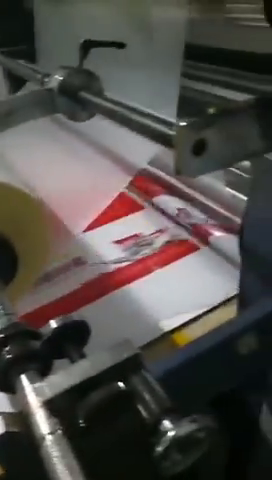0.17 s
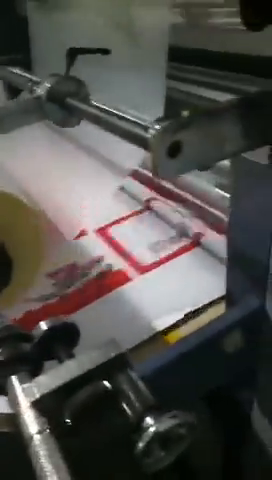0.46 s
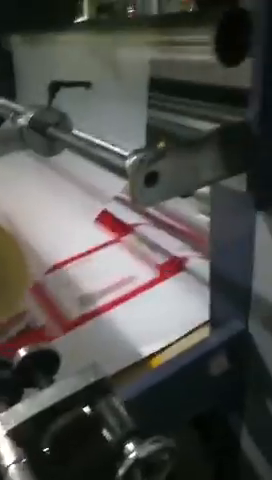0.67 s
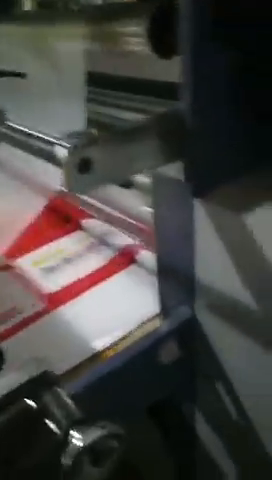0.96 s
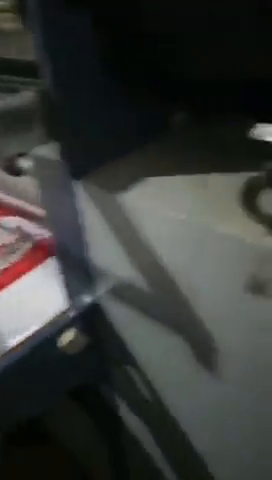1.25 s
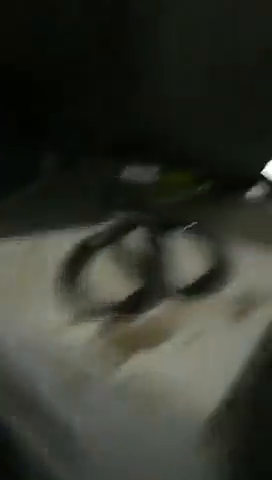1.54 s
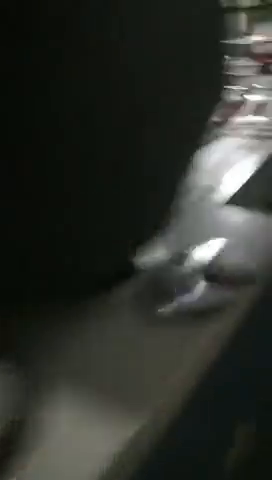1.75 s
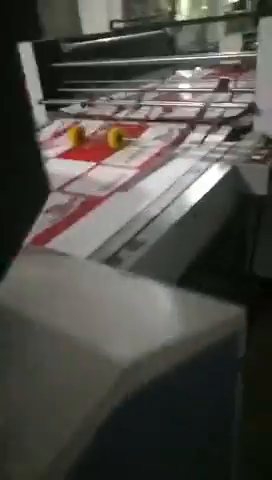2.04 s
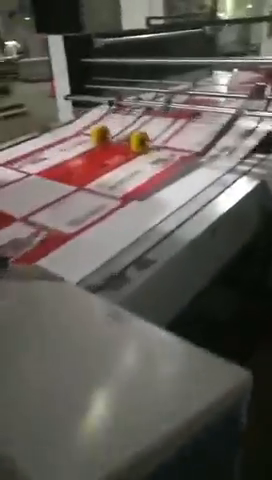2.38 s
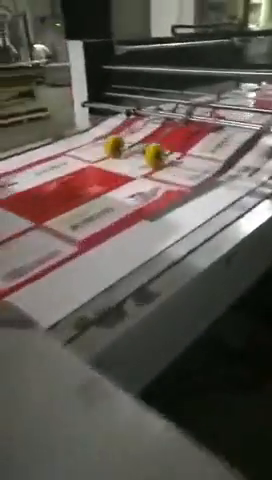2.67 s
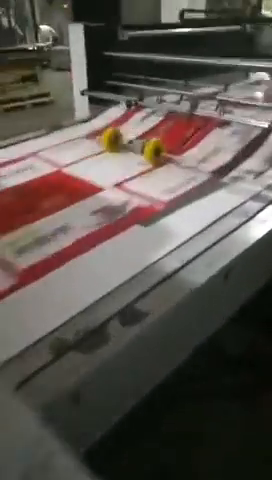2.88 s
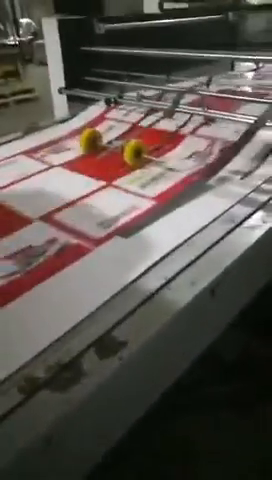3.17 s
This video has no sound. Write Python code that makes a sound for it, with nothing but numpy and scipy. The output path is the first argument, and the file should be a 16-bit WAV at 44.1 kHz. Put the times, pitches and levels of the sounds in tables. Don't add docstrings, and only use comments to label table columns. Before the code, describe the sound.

A sheet-feeding machine roars throughout, about 3.3 seconds: dense roller noise, low frame rumble, a hollow table boom and a motor hum that surges unevenly. Suction air hisses in puffs from 0.6 to 1.2, around 1.6-2.2, and near 2.8-3.3, with a faint whistle near 3.0. Metal grippers clack at 1.3 and clatter hardest at 2.25-2.4, with short hall echo. The roar eases slightly late; close phone stereo.

```python
import sys
import numpy as np
from scipy import signal
from scipy.fft import rfft, irfft, next_fast_len
from scipy.io import wavfile

SR = 44100
rng = np.random.default_rng(int(sys.argv[2]) if len(sys.argv) > 2 else 0)


def transcribe(signal):
    frames = np.atleast_2d(signal).T
    limited = np.clip(frames, -1, 1)
    pcm = np.round(limited * 32767).astype(np.int16)
    wavfile.write(sys.argv[1], SR, pcm)


def nominal_scale(level):
    x = np.asarray(level, float) / 20
    return 10 ** x


N = 145971
T = np.arange(N) / SR


def in_time(rows):
    return np.interp(T, *np.transpose(rows))


def at_hz(points, hz):
    log_hz = np.log(np.array(points)[:, 0])
    return np.interp(np.log(hz), log_hz, np.array(points)[:, 1])


def rms_one(x):
    return x / np.sqrt(np.mean(x ** 2) + 1e-20)


def drift(rate_hz):
    r = np.exp(-80 * np.pi * rate_hz / SR)
    slow = signal.lfilter([1], [1, -2 * r, r * r], rng.standard_normal(N // 40 + 2002))[2000:]
    return np.interp(np.arange(N) / 40, np.arange(len(slow)), rms_one(slow - slow.mean()))


def bandpass(x, low_hz, high_hz):
    return signal.sosfilt(signal.butter(2, [low_hz, high_hz], "band", fs=SR, output="sos"), x)


def resonance(x, hz, width_hz):
    r = np.exp(-np.pi * width_hz / SR)
    poles = [1, -2 * r * np.cos(2 * np.pi * hz / SR), r * r]
    return signal.lfilter([(1 - r * r) / 2, 0, (r * r - 1) / 2], poles, x + 1e-18)


def narrow(hz, width_hz):
    noise = rng.standard_normal((2, N + SR))
    tone = resonance(resonance(noise, hz, width_hz), hz, width_hz)
    return rms_one(tone[:, SR:])


def banded(white, spectrum, low_hz, high_hz, count, shared_db, own_db, rate):
    out = 0
    together = drift(rate / 2)
    edges = np.geomspace(low_hz, high_hz, count + 1)
    for k, (low, high) in enumerate(zip(edges, edges[1:])):
        band = bandpass(white[k % 2], low, high)
        flicker_db = shared_db * together + own_db * drift(rate)
        out = out + band * nominal_scale(at_hz(spectrum, np.sqrt(low * high)) + flicker_db)
    return rms_one(out)


# (time [s], level [dB])
NEARNESS = [(0.0, -26), (0.36, -27.5), (0.56, -27), (0.72, -26), (1.2, -26.5), (1.55, -26.5), (1.9, -27),
            (2.18, -28), (2.42, -27), (2.55, -29), (2.72, -29.5), (3.0, -29.5), (3.31, -29)]


def nearness():
    return in_time(NEARNESS)


# (time [s], hum level [dB], octave level [dB])
MOTOR_LOAD = [(0.0, -33, -47), (0.05, -34, -43), (0.31, -23.5, -34), (0.45, -35, -25), (0.57, -15.5, -30),
              (0.8, -30, -39), (1.23, -40.5, -27.5), (1.29, -32, -55), (1.35, -18.5, -34),
              (1.58, -26.5, -39), (1.66, -26.5, -18.5), (1.82, -34, -34), (1.95, -15.5, -27.5),
              (2.21, -50, -29.5), (2.29, -29, -39), (3.18, -30, -36), (3.235, -41, -20), (3.31, -20, -33)]
# (frequency [Hz], width [Hz], level re load [dB])
MOTOR_HUM = [
    (113.85, 8, -6.5),
    (228, 11, -4.5),
]
# (multiple of the mesh frequency [1], level [dB])
GEAR_MESH = [(2, -44.5), (3, -47.5), (5, -48)]
MESH_HZ, MESH_WIDTH_HZ = 316.3, 8


def motor(near_db):
    times, *loads = np.transpose(MOTOR_LOAD)
    hum = 0
    for (hz, width_hz, db), load_db in zip(MOTOR_HUM, loads):
        level_db = db + np.interp(T, times, load_db) + 2.3 * drift(14.0)
        phase = 2 * np.pi * np.cumsum(hz + width_hz * 0.5 * drift(8.05)) / SR
        hum = hum + nominal_scale(level_db) * np.sqrt(2) * np.sin(phase)
    mesh = sum(nominal_scale(db) * narrow(k * MESH_HZ, MESH_WIDTH_HZ) for k, db in GEAR_MESH)
    return hum + mesh * nominal_scale(near_db - near_db.mean())


# (time [s], level [dB])
BOARD_DRUMMING = [(0.0, -25.5), (0.3, -34.5), (0.6, -29), (0.9, -30), (1.3, -27.5), (1.52, -27),
                  (1.68, -27.5), (1.85, -29), (2.05, -25.5), (2.3, -26), (2.6, -33.5), (2.85, -32),
                  (3.1, -30.5), (3.31, -34.5)]
TABLE_HZ, TABLE_WIDTH_HZ, TABLE_DB = 302.6, 130, -2


def feed_table():
    return nominal_scale(TABLE_DB + in_time(BOARD_DRUMMING)) * narrow(TABLE_HZ, TABLE_WIDTH_HZ)


# (frequency [Hz], density [dB per Hz])
RUMBLE_SPECTRUM = [(12, -41), (20, -15.5), (43, 2), (75, -1.5), (117, 4.5), (198, 1), (300, -0.5),
                   (400, -16.5), (520, -28), (700, -15), (910, -45), (1540, -120)]
RUMBLE_DB, RUMBLE_FOLLOWS = -25, 0.66


def rumble(near_db):
    white = rng.standard_normal((2, 2, N))
    shake = banded(white, RUMBLE_SPECTRUM, 22.74, 509, count=10, shared_db=-1.5, own_db=0.28, rate=14.0)
    return nominal_scale(RUMBLE_DB + RUMBLE_FOLLOWS * (near_db - near_db.mean())) * shake


# (frequency [Hz], density [dB per Hz])
ROLLER_SPECTRUM = [(240, -31), (400, -2.5), (586, -2.5), (639, -0.5), (1030, -3), (1820, -7), (2160, -7.5),
                   (3370, -9.5), (7600, -15), (9880, -46), (16700, -120)]
ROLLERS_DB = 1


def rollers(near_db):
    contact_db = 2.6 * np.minimum(rng.exponential(1, (2, 1, N)), 5)
    grit = rng.standard_normal((2, 2, N)) * nominal_scale(contact_db)
    roar = banded(grit, ROLLER_SPECTRUM, 405, 8170, count=13, shared_db=0.49, own_db=1.5, rate=14.0)
    return nominal_scale(near_db + ROLLERS_DB) * roar


# (start [s], hold [s], level [dB], centre [Hz])
SUCTION_PUFFS = [(0.592, 0.055, -28.5, 3030), (0.647, 0.06, -32, 4180), (0.769, 0.082, -31, 4800),
                 (0.912, 0.12, -33.5, 3500), (1.04, 0.068, -33.5, 4600), (1.156, 0.31, -44, 4970),
                 (1.642, 0.047, -30.5, 4530), (1.853, 0.062, -33.5, 5500), (1.904, 0.14, -28.5, 6000),
                 (2.052, 0.12, -32, 4600), (2.408, 0.2, -40, 6600), (2.83, 0.1, -31.5, 4430),
                 (2.914, 0.15, -32.5, 5030), (3.07, 0.25, -33, 5050)]
PUFF_ATTACK_S, PUFF_RELEASE_S, PUFF_FALL_DB_PER_OCT2 = 0.037, 0.054, 10
WHISTLE_HZ, WHISTLE_WIDTH_HZ, WHISTLE_DB = 4600, 80, -43
WHISTLE_S, WHISTLE_SPREAD_S = 2.96, 0.08


def suction():
    edges = np.geomspace(2000, 8200, 9)
    white = rng.standard_normal((2, 2, N))
    shapes = []
    for start, hold, _, _ in SUCTION_PUFFS:
        attack = np.clip((T - start) / PUFF_ATTACK_S, 0, 1)
        shapes.append(attack * np.exp(-np.maximum(T - start - hold, 0) / PUFF_RELEASE_S))
    hiss = 0
    for k, (low, high) in enumerate(zip(edges, edges[1:])):
        band = rms_one(bandpass(white[k % 2], low, high))
        power = 0
        for shape, (_, _, db, centre_hz) in zip(shapes, SUCTION_PUFFS):
            octaves = np.log2(np.sqrt(low * high) / centre_hz)
            power = power + (shape * nominal_scale(db - PUFF_FALL_DB_PER_OCT2 * octaves ** 2)) ** 2
        hiss = hiss + band * np.sqrt(power / 4) * nominal_scale(1.8 * drift(9.0))
    swell = np.exp(-((T - WHISTLE_S) / WHISTLE_SPREAD_S) ** 2)
    return hiss + nominal_scale(WHISTLE_DB) * swell * narrow(WHISTLE_HZ, WHISTLE_WIDTH_HZ)


HALL_T60_S, HALL_DB, HALL_CUT_HZ, HALL_RISE_S = 1, -15, 2000, 0.029


def hall(dry):
    t = T[:SR]
    tail = rng.standard_normal((2, SR)) * nominal_scale(-60 * t / HALL_T60_S) * np.clip(t / HALL_RISE_S, 0, 1)
    tail = signal.lfilter(*signal.butter(1, HALL_CUT_HZ, fs=SR), tail)
    tail = tail / np.sqrt(np.sum(tail[0] ** 2))
    return nominal_scale(HALL_DB + 6) * signal.fftconvolve(dry, tail, axes=1)[:, :N]


# (time [s], level [dB], low thump level [dB], burst T60 [s])
GRIPPER_CLACKS = [(0.847, -31, -25.5, 0.088), (1.322, -28, -34, 0.052), (1.332, -17, -22.5, 0.049),
                  (1.674, -25, -32, 0.042), (2.252, -21.5, -15.5, 0.071), (2.257, -21, -21.5, 0.069),
                  (2.267, -10.5, -18, 0.033), (2.277, -16, -30, 0.067), (2.29, -27, -12.5, 0.16),
                  (2.315, -23.5, -28.5, .08), (2.333, -22.5, -27, .05), (2.353, -24, -32.5, 0.059),
                  (2.383, -27, -21, 0.037)]
# (frequency [Hz], level [dB], T60 [s])
GRIPPER_MODES = [(448, 5.5, 0.06), (800, -5.5, 0.0074), (1780, -7.5, 0.005), (2270, -2, 0.032),
                 (2640, 0, 0.019), (3190, -4.5, 0.02), (3500, -4.5, 0.013), (4090, -2.5, 0.0067),
                 (4830, -5, 0.015)]
CONTACT_S, RATTLE_CUT_HZ, RING_DB = 0.003, 5100, -8
THUMP_HZ, THUMP_T60_S = 160, 0.09


def grippers():
    rattle, push = np.zeros(N), np.zeros(N)
    for start, db, thump_db, t60 in GRIPPER_CLACKS:
        onset = np.clip((T - start) / CONTACT_S, 0, 1)
        rattle += onset * nominal_scale(db - 60 * np.maximum(T - start, 0) / t60)
        push[int(start * SR)] = nominal_scale(thump_db)
    lowpass = signal.butter(2, RATTLE_CUT_HZ, fs=SR, output="sos")
    noise = signal.sosfilt(lowpass, rattle * rng.standard_normal((2, N)))
    dull = bandpass(noise, 330, 3600)
    metal = sum(nominal_scale(db + 15) * resonance(noise, hz, 2.2 / t60 * 3) for hz, db, t60 in GRIPPER_MODES)
    r, w = nominal_scale(-60 / (THUMP_T60_S * SR)), 2 * np.pi * THUMP_HZ / SR
    soft_push = signal.lfilter([0.02], [1, -0.98], push)
    thump = signal.lfilter([0, 2 * np.sin(w)], [1, -2 * r * np.cos(w), r * r], soft_push + 1e-18)
    clack = dull + nominal_scale(RING_DB) * metal + thump
    return clack + hall(clack)


def scene():
    near_db = nearness()
    steady = motor(near_db) + feed_table() + rumble(near_db) + rollers(near_db)
    return steady + suction() + grippers()


def roll_off(x):
    return signal.sosfilt(signal.butter(12, 8900, fs=SR, output="sos"), x)


# (frequency [Hz], left minus right [dB])
PORT_BALANCE = [(250, 0.0), (700, .6), (2500, .5), (4500, -.3), (6000, -3), (7600, -8)]
PORT_LAG_S, AXIAL_SHARE = 0.00057, 0.25
SIDE_CUT_HZ, SIDE_DB = 325, -0.2


def record(dry):
    size = next_fast_len(N + 4096)
    hz = np.maximum(np.arange(size // 2 + 1) * SR / size, 1)
    diffuse = np.sinc(2 * hz * PORT_LAG_S * 2)
    axial = np.cos(2 * np.pi * hz * PORT_LAG_S)
    alike = np.clip((1 - AXIAL_SHARE) * diffuse + AXIAL_SHARE * axial, -0.95, 0.95)
    cut = (hz / SIDE_CUT_HZ) ** 4
    bass = np.clip(2 - hz / SIDE_CUT_HZ, 0, 1)
    mid, side = rfft(dry, size)
    mid = mid * np.sqrt(1 + alike * (1 - bass))
    side = side * np.sqrt(1 - alike) * cut / (1 + cut) * nominal_scale(SIDE_DB)
    ports = nominal_scale(at_hz(PORT_BALANCE, hz) / 2)
    pair = irfft(np.array([(mid + side) * ports, (mid - side) / ports]), size)[:, :N]
    return roll_off(np.clip(pair, -0.95, 0.95))


dry = scene()
out = record(dry)
transcribe(out)
```